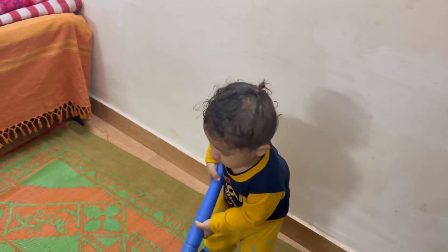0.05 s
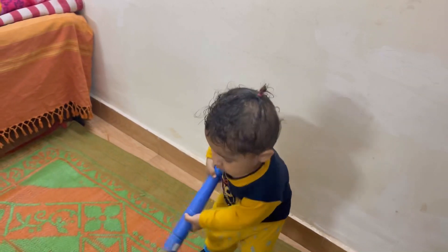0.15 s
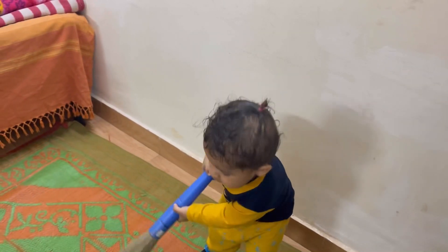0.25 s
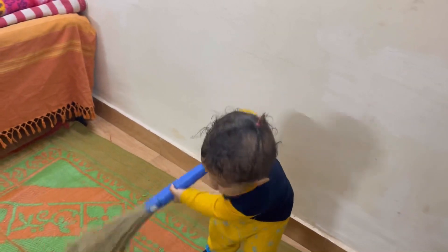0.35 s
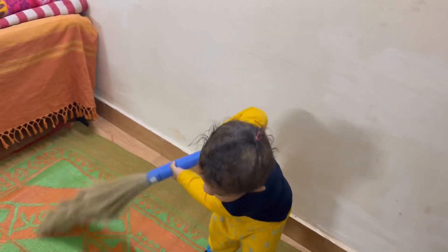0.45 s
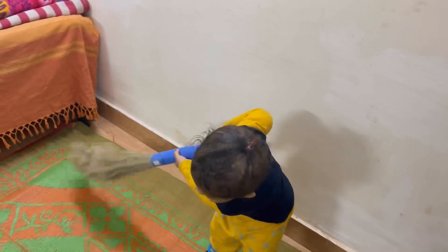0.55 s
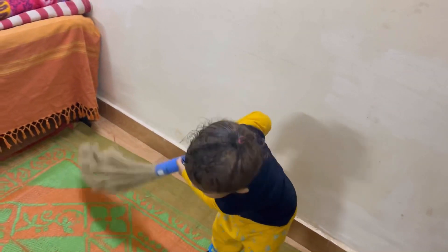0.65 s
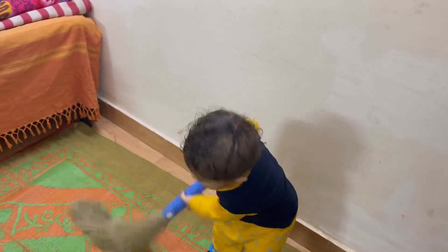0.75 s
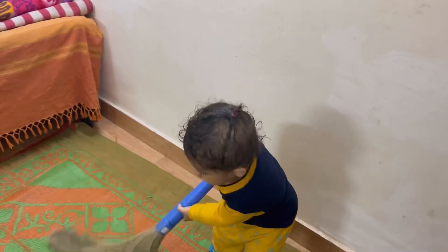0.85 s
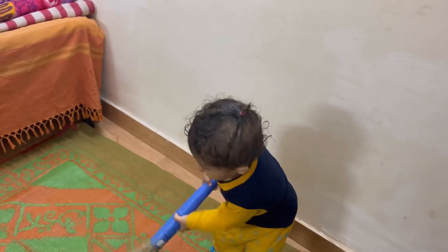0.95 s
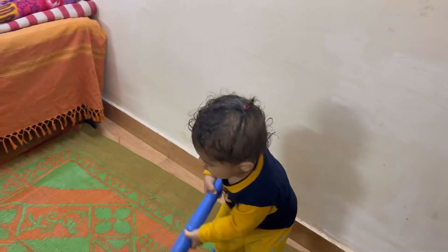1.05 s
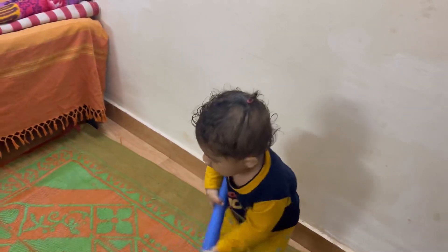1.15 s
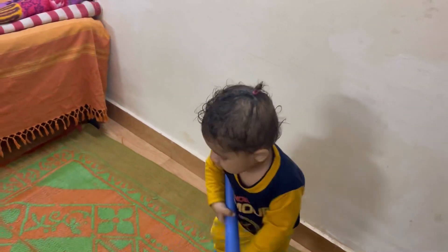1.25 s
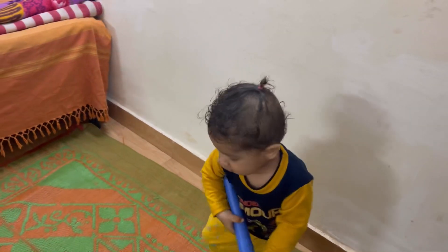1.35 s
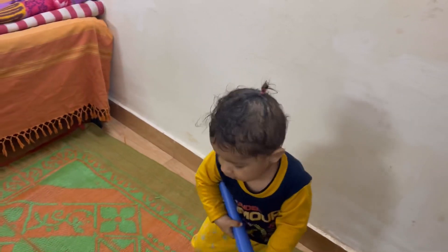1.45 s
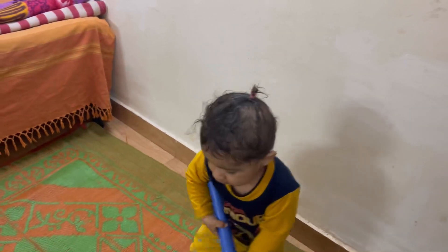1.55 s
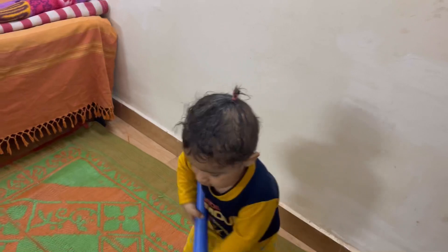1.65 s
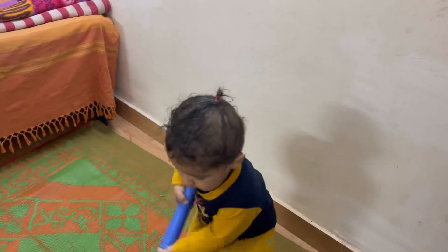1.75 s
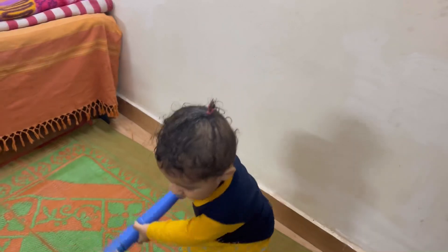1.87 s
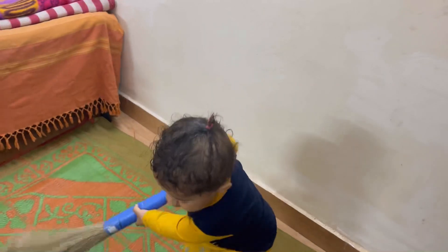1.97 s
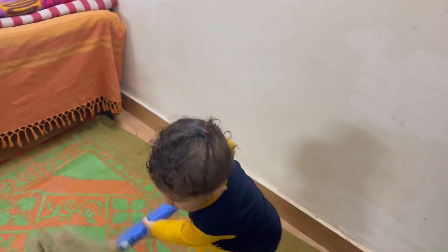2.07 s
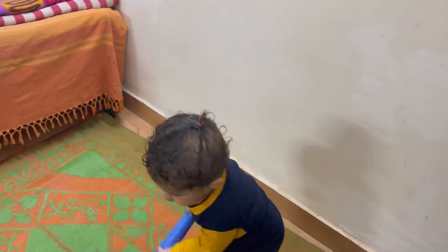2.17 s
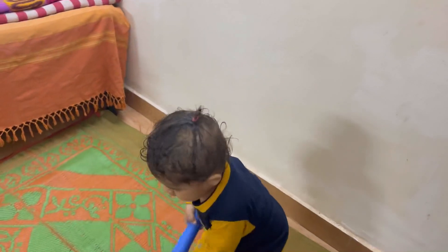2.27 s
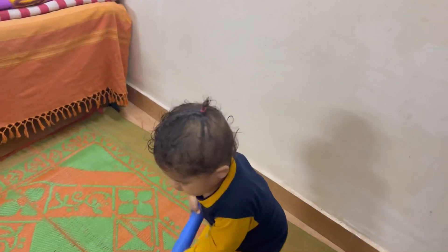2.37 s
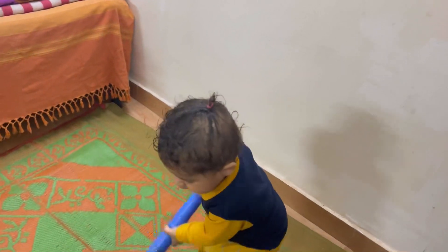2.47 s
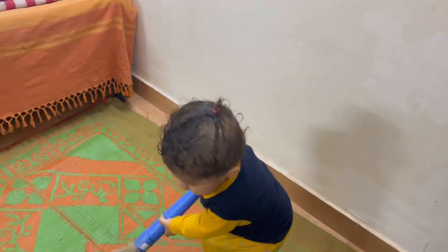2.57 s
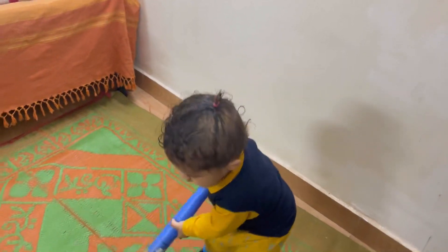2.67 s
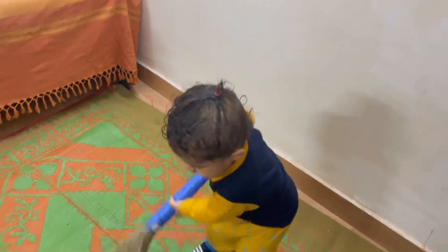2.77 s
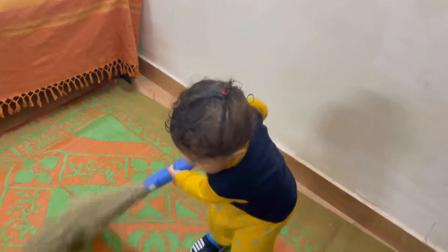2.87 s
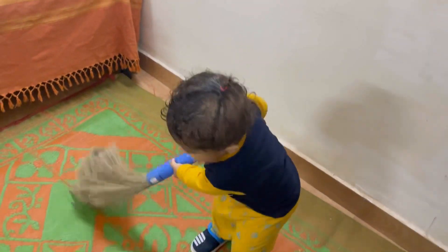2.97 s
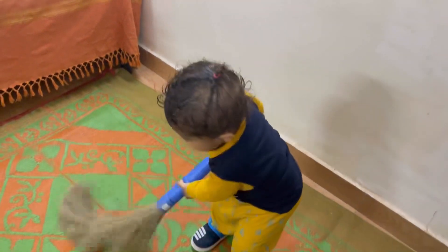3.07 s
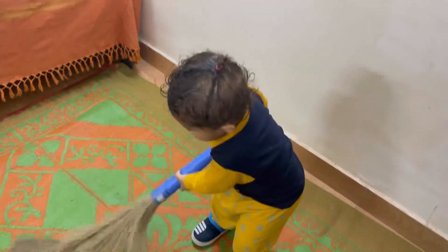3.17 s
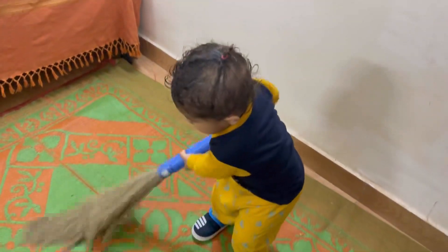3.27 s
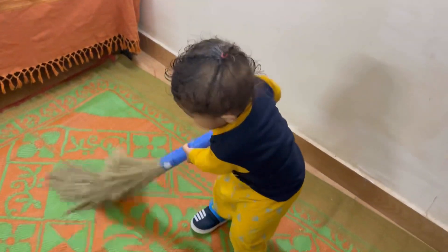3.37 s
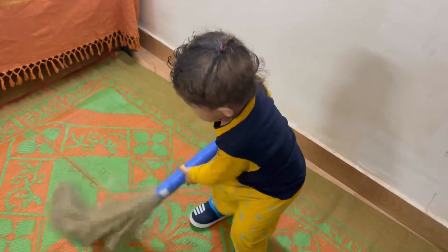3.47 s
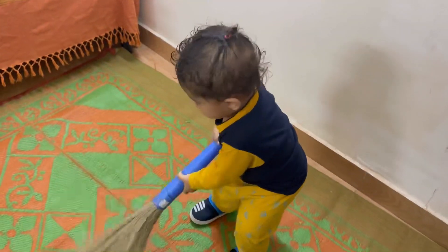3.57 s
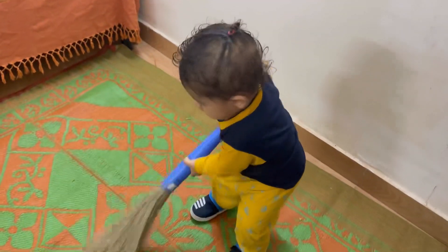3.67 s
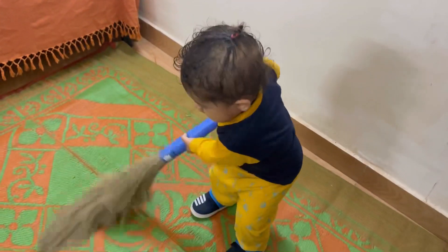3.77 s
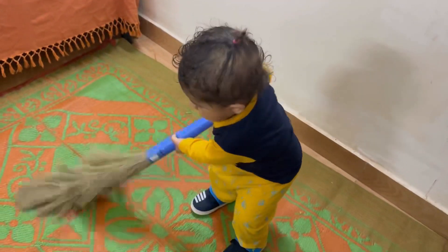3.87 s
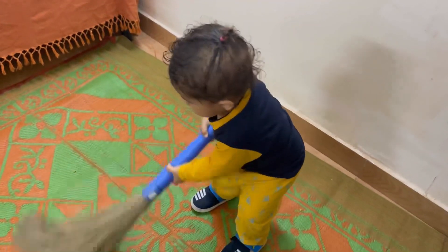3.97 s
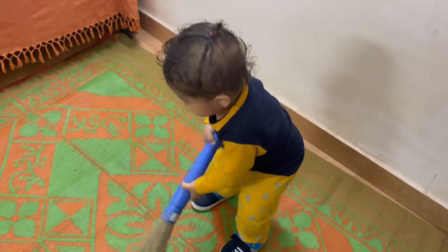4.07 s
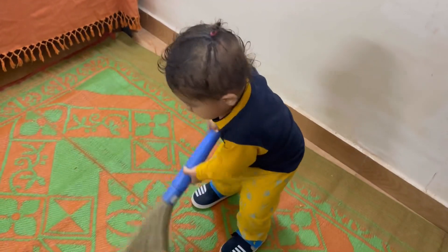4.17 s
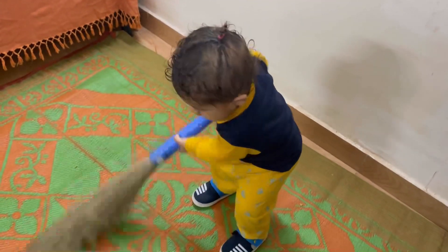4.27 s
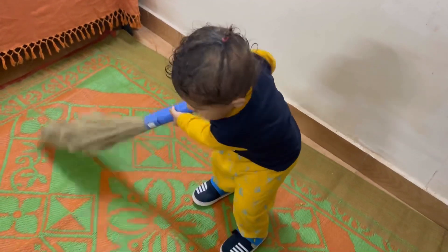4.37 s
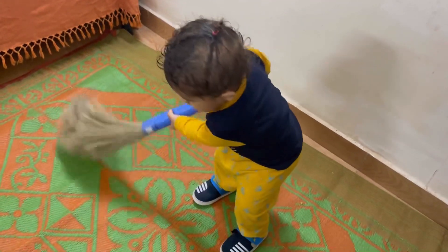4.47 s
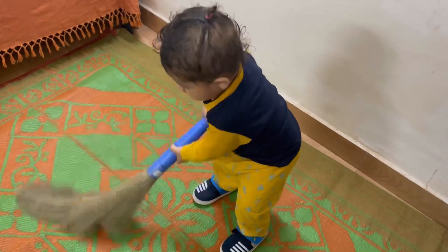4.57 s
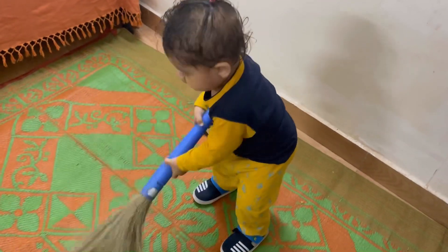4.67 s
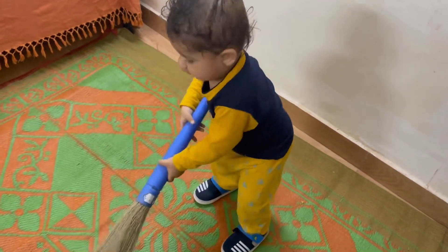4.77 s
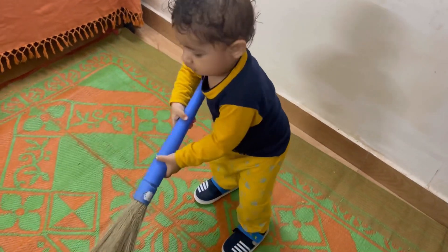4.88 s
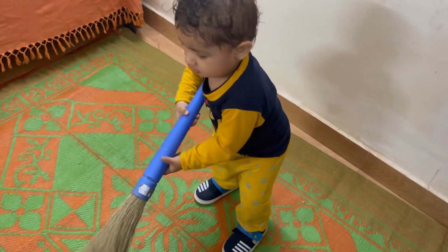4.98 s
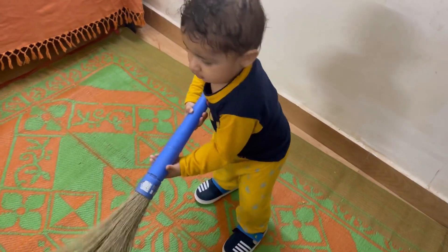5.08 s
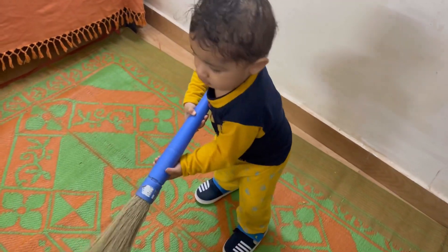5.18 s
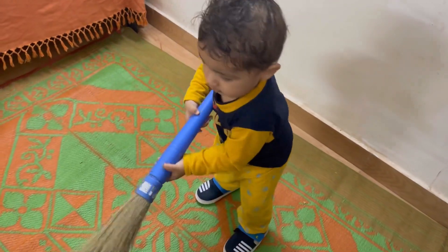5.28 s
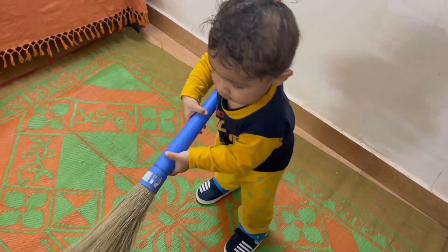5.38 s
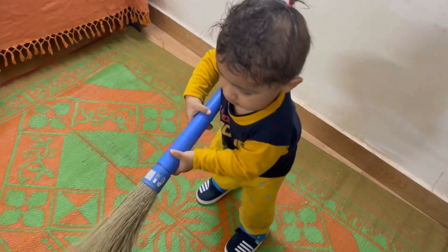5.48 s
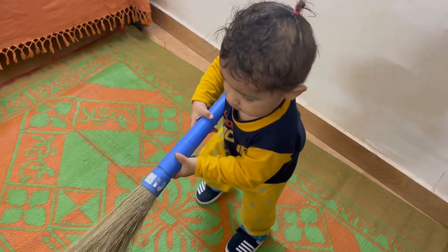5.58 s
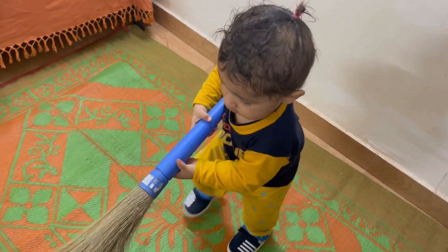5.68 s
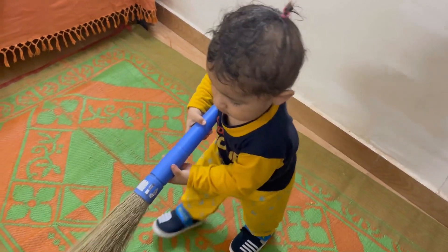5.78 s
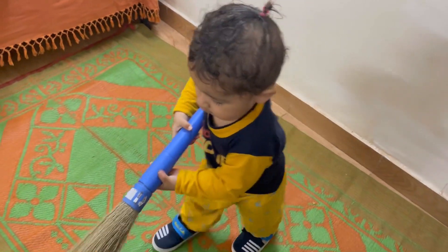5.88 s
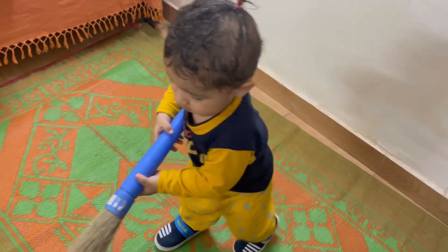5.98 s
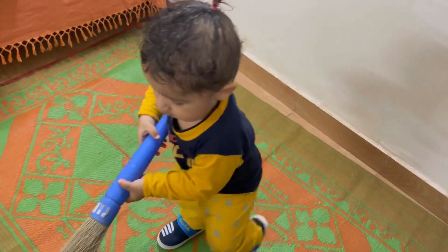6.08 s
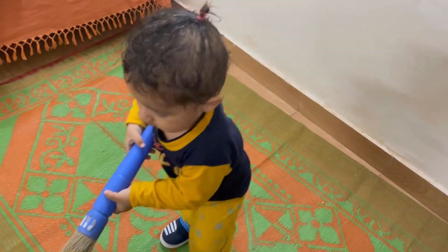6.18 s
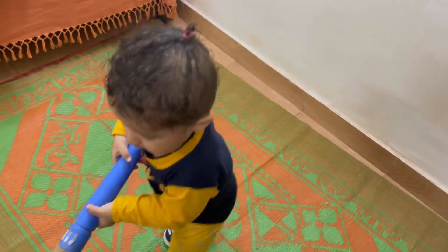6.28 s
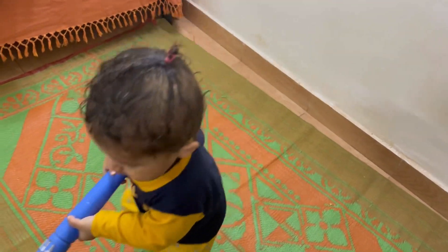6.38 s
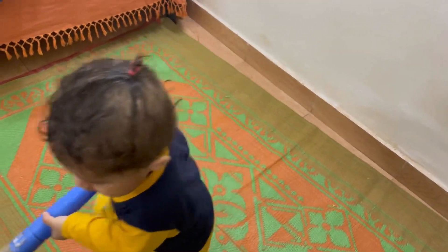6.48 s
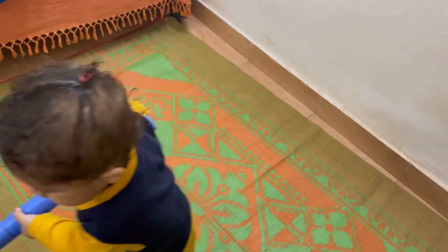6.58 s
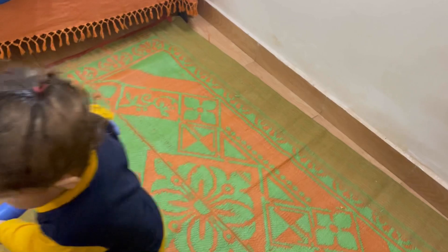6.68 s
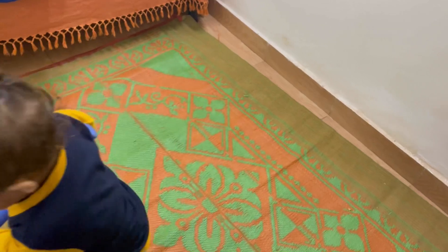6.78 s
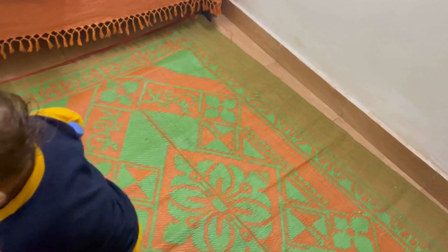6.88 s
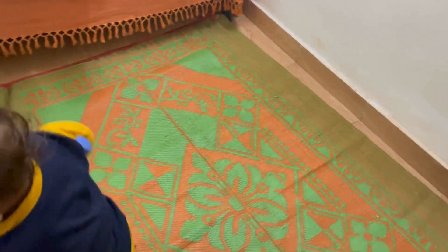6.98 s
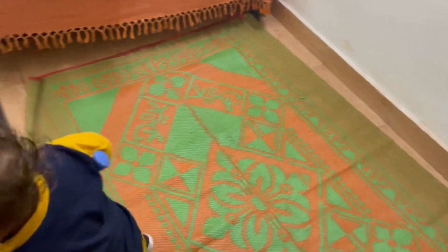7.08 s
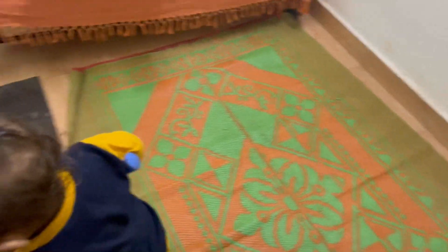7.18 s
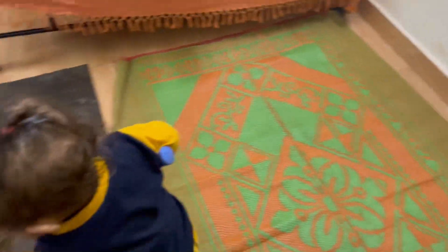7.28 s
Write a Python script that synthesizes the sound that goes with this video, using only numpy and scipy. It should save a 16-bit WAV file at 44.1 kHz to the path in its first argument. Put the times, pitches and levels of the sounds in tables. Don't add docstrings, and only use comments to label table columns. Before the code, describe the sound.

A dry grass broom swishes over a woven plastic mat in uneven strokes, then small shoes shuffle and knock, above low traffic rumble.

```python
import sys
import numpy as np
from scipy import signal
from scipy.fft import rfft, irfft, dct, next_fast_len
from scipy.io import wavfile
from scipy.ndimage import uniform_filter1d, map_coordinates

SR = 44100
rng = np.random.default_rng(int(sys.argv[2]) if len(sys.argv) > 2 else 0)


def generate_wav(sig):
    pcm = np.round(np.clip(np.atleast_2d(sig).T, -1, 1) * 32767).astype(np.int16)
    wavfile.write(sys.argv[1], SR, pcm)


def how_loud(loudness_db):
    steps = np.asarray(loudness_db, float) / 20
    return 10 ** steps


N = 323694


def unit(x):
    return x / np.sqrt(np.mean(x ** 2) + 1e-20)


def along(points, hz):
    f, v = np.transpose(points)
    return np.interp(np.log(hz + 1), np.log(f + 1), v)


def curves(rows, outside=None):
    s, *columns = np.transpose(rows)
    return [np.interp(np.arange(N) / SR, s, column, outside, outside) for column in columns]


def wobble(rate):
    knots = rng.standard_normal(int(N * rate / SR) + 4)
    return map_coordinates(knots, [np.arange(N) * rate / SR])


def filtered(x, response):
    m = next_fast_len(N + SR // 2)
    return irfft(rfft(x, m) * response(np.fft.rfftfreq(m, 1 / SR)), m)[..., :N]


def coloured(x, spectrum):
    return unit(filtered(x, lambda hz: how_loud(along(spectrum, hz))))


def resonant(x, modes):
    def response(f):
        total = 0
        for k, (centre, width, db) in enumerate(modes):
            peak = 1j * f * width / (centre * centre - f * f + 1j * f * width)
            total = total + (-1) ** k * how_loud(db) * peak
        return total
    return filtered(x, response)


def patchy(depth_db):
    z = signal.stft(rng.standard_normal((2, N)), nperseg=512)[2]
    field = uniform_filter1d(rng.standard_normal(z.shape[1:]), size=8, axis=0)
    field = uniform_filter1d(field, size=5, axis=1)
    return signal.istft(z * how_loud(depth_db * unit(field)), nperseg=512)[1][:, :N]


def tone(hz, db):
    return np.sqrt(2) * how_loud(db) * np.sin(2 * np.pi * np.cumsum(hz) / SR)


def strokes():
    # (peak time [s], swish level [dB], rise [s], fall [s], body level over the swish [dB])
    sweeps = [(0.11, -42.5, 0.053, 0.097, -26), (0.2, -31.5, 0.062, 0.079, -21),
              (0.282, -31.5, 0.06, 0.067, -20.5), (1.93, -47.5, 0.072, 0.037, -6.5),
              (0.451, -40, 0.48, 0.051, -16.5), (0.842, -37, 0.055, 0.21, -26),
              (1.079, -34, 0.06, 0.14, -24.5), (1.231, -29.5, 0.13, 0.1, -24),
              (1.596, -41, 0.034, 0.034, -8.5), (1.732, -26, 0.11, 0.12, -20.5),
              (1.792, -30, 0.043, 0.057, -37), (2.224, -26, 0.057, 0.072, -19),
              (2.466, -26.5, 0.065, 0.13, -24.5), (2.563, -27.5, 0.13, 0.037, -16.5),
              (2.686, -34, 0.056, 0.049, -20), (2.843, -30.5, 0.057, 0.089, -19),
              (3.144, -33, 0.075, 0.049, -25.5), (3.319, -31, 0.079, 0.072, -21.5),
              (3.529, -29, 0.089, 0.084, -19.5), (3.709, -26, 0.047, 0.16, -20.5),
              (4.03, -26, 0.055, 0.078, -18.5), (4.21, -26, 0.047, 0.11, -22.5),
              (4.279, -26, 0.057, 0.054, -19), (4.628, -29.5, 0.054, 0.097, -20.5)]
    landings = [(0.001, -48, 0.025, 0.019, -29), (0.541, -58, 0.002, 0.092, -24),
                (0.73, -35, 0.0035, 0.36, -19.5), (2.103, -33.5, 0.0069, 0.15, -20),
                (2.41, -46, 0.0087, 0.046, -24), (3.013, -46.5, 0.0075, 0.05, -23),
                (3.027, -32.5, 0.012, 0.11, -19), (1.553, -48.5, 0.00613, 0.055, -13.5),
                (3.473, -40, 0.008, 0.07, -26), (3.943, -35.5, 0.006, 0.055, -22),
                (4.528, -29, 0.0094, 0.15, -22)]
    shuffles = [(4.947, -58, 0.031, 0.13, -7), (5.3, -61.5, 0.034, 0.2, -4.5),
                (5.636, -68, 0.085, 0.083, 6), (5.815, -48.5, 0.0043, 0.008, -14),
                (5.83, -58, 0.01, 0.03, -8), (5.867, -46.5, 0.015, 0.012, -11),
                (5.885, -57.5, 0.02, 0.062, -4), (6.068, -64.5, 0.1232, 0.032, -3),
                (6.17, -72, 0.091, 0.1, -1), (6.268, -51.5, 0.0099, 0.079, -8.5),
                (6.405, -59, 0.014, 0.08, -4), (6.619, -48.5, 0.0039, 0.067, -7.5),
                (6.657, -42, 0.0056, 0.011, -12), (6.677, -58.5, 0.081, 0.17, -10),
                (6.933, -63, 0.1, 0.058, -7), (6.991, -44, 0.0025, 0.032, -6.5),
                (7.046, -59, 0.019, 0.72, -10), (7.333, -53.5, 0.026, 0.022, -3.5)]
    swing_db = 21
    roundness = 1.24
    body_swing, body_lingers = 0.89, 1.52
    t, swish, body = np.arange(0, N, 32) / SR, 0, 0
    for s, db, rise, fall, body_db in sweeps + landings + shuffles:
        def drop(slower):
            distance = (t - s) / np.where(t < s, rise, slower * fall)
            return swing_db * (np.hypot(distance, roundness) - roundness)
        swish = swish + how_loud(db - drop(0.94)) ** 2
        body = body + how_loud(db + body_db - body_swing * drop(body_lingers)) ** 2
    return [np.interp(np.arange(N) / SR, t, np.sqrt(power)) for power in (swish, body)]


def slips(rate, spread_db, life):
    strength = how_loud(spread_db * np.minimum(rng.exponential(size=N), 3.5))
    starts = (rng.random(N) < rate / SR) * strength
    return unit(signal.lfilter([1], [1, -np.exp(-1 / (life * SR))], starts))


def broom():
    # (frequency [Hz], level [dB per Hz])
    swish_spectrum = [(1500, -45.5), (3000, -21.5), (4500, -13.5), (6500, -9), (8000, -2.5), (8700, -1.5),
                      (10200, 1.5), (11200, -5), (12200, -13.5), (13200, -17.5), (14200, -17), (15500, -20),
                      (16000, -47)]
    # (frequency [Hz], level [dB per Hz])
    body_spectrum = [(500, -11), (1000, -8), (1500, -7.5), (2500, -4.5), (3500, -5), (5000, -3.5),
                     (8000, -22.5)]
    swish, body = strokes()
    tips = patchy(depth_db=1.0) * (2.5 + 0.47 * slips(rate=1100, spread_db=-1.0, life=0.00068))
    scrape = patchy(depth_db=1.0) * (4.5 + 0.59 * slips(rate=150, spread_db=2.0, life=0.0017))
    flutter_db = 0.25 * wobble(rate=34) + 0.56 * wobble(rate=28)
    hiss = swish * how_loud(flutter_db + 4.0) * coloured(tips, swish_spectrum)
    return hiss + body * how_loud(flutter_db + 3.5) * coloured(scrape, body_spectrum)


def snaps():
    # (time [s], peak level [dB], bright part over the peak [dB])
    stalk_snaps = [(0.079, -54, -2), (0.1176, -39, -4), (0.1351, -41, -6), (0.4506, -42, -3),
                   (0.5434, -37.5, 4.5), (0.5896, -47, -4), (0.6084, -44.5, 4.5), (0.6913, -49, 9),
                   (0.7563, -30, -2), (0.7855, -29, 1), (0.9143, -46, -4), (1.4501, -43, -8),
                   (1.551, -43, -9), (1.5715, -27, -14), (1.573, -24, -12), (1.5735, -27.5, -13),
                   (1.5745, -29, -13.5), (1.641, -32, -14), (1.6864, -27, -10), (1.9395, -37, -14),
                   (1.761, -41, 6), (2.1268, -41.5, 12), (2.683, -24, -7), (2.6966, -23, -15),
                   (2.799, -44, -9), (3.0235, -34, -3), (3.413, -32, -9), (3.984, -38, 3),
                   (4.6187, -35, -3), (4.881, -37, -1.5), (4.9486, -21.5, -19), (4.9504, -28, -9),
                   (4.952, -36, -6), (5.8145, -47, 2), (5.8155, -48, 4), (5.8605, -45, 3),
                   (5.874, -52, 3.5), (6.0039, -49, 0), (6.0689, -47, -1), (6.26, -47, 1),
                   (6.289, -33.5, -4), (6.62, -48, 3), (6.654, -36, 2), (6.9887, -38, -3),
                   (6.9996, -30, -2), (7.3344, -29.5, -13)]
    t60 = 0.014
    bright, stalk = np.zeros((2, N + SR)), np.zeros((2, N + SR))
    t = np.arange(SR // 50) / SR
    for s, db, bright_db in stalk_snaps:
        puff = 0.45 * rng.standard_normal((2, 2, len(t))) * how_loud(-60 * t / t60)
        puff[:, 0, 0] += 6.0
        place = slice(round(s * SR), round(s * SR) + len(t))
        stalk[:, place] += how_loud(db + 0.5) * puff[0]
        bright[:, place] += how_loud(db + bright_db + 8.5) * puff[1]
    edge_curve = [(3000, -12.0), (5500, -9.0), (9000, -1.0), (12000, -11), (15000, -24)]  # (Hz, dB)
    edge = filtered(bright[:, :N], lambda hz: how_loud(along(edge_curve, hz)))
    return edge + resonant(stalk[:, :N], [(1100, 900, -5), (2280, 1600, 2), (4350, 2200, -5)])


def knocks():
    # (time [s], peak level [dB], bright part [dB], ring frequency [Hz])
    blows = [(1.573, -48, -16, 232), (1.5735, -32.5, -23, 606), (1.576, -29, -25, 380),
             (1.596, -39, -27, 400), (1.606, -43, -22, 420), (6.655, -33, -28, 294),
             (6.991, -35.5, -4.5, 248), (7.001, -31, -14, 306.5), (7.005, -29.5, -6, 310),
             (7.011, -38.5, -0.5, 520), (7.018, -38.5, -2, 330), (7.029, -44, 1, 450),
             (7.039, -33.5, -8.5, 255), (7.047, -44, 1, 330), (7.062, -44, -11, 300), (7.074, -46, 1, 418),
             (7.084, -47, -9, 420), (7.147, -43, -15, 270)]
    # (centre [Hz], width [Hz], level [dB])
    floor_modes = [(223, 120, 5.5), (304, 190, 4.5), (447, 140, 3.5), (700, 180, 2.5)]
    # (centre [Hz], width [Hz], level [dB])
    sole_modes = [(860, 210, -2.5), (1380, 220, 3), (2300, 1000, -7.5)]
    thump, clack, ring = np.zeros((2, N + SR)), np.zeros((2, N + SR)), np.zeros(N + SR)
    t = np.arange(SR // 10) / SR
    for s, db, bright_db, hz in blows:
        blow = rng.standard_normal((2, 2, len(t))) * how_loud(-60 * t / 0.031)
        place = slice(round(s * SR), round(s * SR) + len(t))
        thump[:, place] += how_loud(db + 11.5) * blow[0]
        clack[:, place] += how_loud(db + bright_db + 18.0) * blow[1]
        ring[place] += how_loud(db + 0.5 - 60 * t / 0.042) * np.sin(2 * np.pi * hz * t)
    return resonant(thump[:, :N], floor_modes) + resonant(clack[:, :N], sole_modes) + ring[:N]


def squeaks():
    # (start [s], end [s], rms level [dB], first frequency [Hz], last frequency [Hz], width [Hz],
    #  lower resonance [Hz])
    twists = [
        (5.361, 5.75, -66, 4160, 4300, 200, 2450),
        (6.425, 6.6, -62, 4260, 4420, 300, 3070),
    ]
    low_width, low_db, fade_s = 220, -3, 0.02
    out = np.zeros((2, N))
    for start, end, db, first_hz, last_hz, width, low_hz in twists:
        rub = rng.standard_normal((2, SR // 2))[:, :round((end - start) * SR)]
        t = np.arange(rub.shape[1]) / SR

        def band(hz, wide):
            limits = [hz - wide / 2, hz + wide / 2]
            return unit(signal.sosfilt(signal.butter(2, limits, "band", fs=SR, output="sos"), rub))
        turn = t / t[-1] * np.pi / 2
        gate = np.clip(np.minimum(t, t[-1] - t) / fade_s, 0, 1)
        upper = np.cos(turn) * band(first_hz, width) + np.sin(turn) * band(last_hz, width)
        lower = how_loud(low_db) * band(low_hz, low_width)
        out[:, round(start * SR):][:, :len(t)] += how_loud(db) * gate * (upper + lower)
    return out


def room(x):
    # (frequency [Hz], time to fall by 60 dB [s])
    decay = [(200, 0.4), (2000, 0.53), (8000, 0.3), (14000, 0.13)]
    hz, t, z = signal.stft(rng.standard_normal((2, SR // 2)), SR, nperseg=256)
    fading = z * how_loud(-60 * t / along(decay, hz)[:, None])
    tail = signal.istft(fading, SR, nperseg=256)[1]
    late = np.pad(x, ((0, 0), (120, 0)))
    return signal.fftconvolve(late, tail / np.linalg.norm(tail[0]), axes=1)[:, :N]


def drones():
    # (time [s], frequency [Hz], rms level [dB])
    slowing = [(0.0, 47.3, -50), (0.05, 47.3, -41), (0.13, 47.17, -34), (0.3, 46.89, -46),
               (0.52, 46.52, -37), (0.61, 47.36, -44), (0.8, 49.13, -36.5), (1.28, 45.56, -54.5),
               (1.5, 48.72, -42.0), (2.09, 47.25, -30.5), (2.26, 47.19, -43.0), (2.41, 48.59, -28.5),
               (2.88, 45.97, -45.0), (3.07, 46.25, -39), (3.2, 46.35, -56), (3.35, 46.47, -44),
               (3.5, 46.37, -52), (4.01, 45.68, -39.5), (4.5, 43.97, -39.0), (5.0, 42.82, -44.5),
               (5.4, 40.8, -48.5), (6.2, 39.79, -59.0), (6.3, 40.5, -51.0)]
    steady = [(0.01, 53.2, -47.5), (0.92, 55.99, -58.0), (1.8, 50.13, -42.0), (2.41, 50.86, -45.5),
              (3.29, 50.59, -54.0), (3.72, 51.62, -40.0), (4.23, 52.06, -48.0), (4.79, 51.53, -37.0),
              (5.3, 53.12, -47.5), (5.51, 51.47, -37.0), (5.9, 54.01, -48.0), (6.6, 51.1, -39.0),
              (6.8, 51.27, -49.5), (7.3, 51.99, -41.0)]
    distant = [(0.05, 44.98, -54.0), (0.6, 40.17, -49.0), (1.1, 42.12, -51.0), (1.49, 39.38, -50.5),
               (1.93, 42.29, -52.5), (2.32, 42.42, -62.0)]
    revving = [(4.2, 61.1, -63), (4.45, 65.8, -50.5), (4.701, 71.3, -46), (5.0, 84.2, -49.5),
               (5.2, 88.8, -67)]
    engine = [(5.5, 165.5, -73), (5.7, 169.5, -56), (5.99, 174.3, -49.5), (6.15, 178.8, -56),
              (6.3, 181, -52.5), (6.48, 182.3, -46.5), (6.6, 188.6, -53), (6.77, 213, -50), (6.9, 202, -79)]
    engine_hz, engine_db = curves(engine)
    fade = np.interp(np.arange(N) / SR, [5.3, 5.5, 6.9, 7.1], [0, 1, 1, 0])
    boom = sum(tone(*curves(vehicle)) for vehicle in (slowing, steady, distant, revving))
    return boom + fade * tone(engine_hz + 1.46 * wobble(rate=30), engine_db + 1.3 * wobble(rate=12))


def street():
    # (time [s], rms level [dB])
    murmur_level = [(0.0, -51), (0.4, -51), (0.75, -51), (1.2, -51.5), (1.75, -50), (2.15, -50.5),
                    (2.5, -50), (3.3, -51.5), (3.9, -52.5), (4.7, -50.5), (5.2, -50), (5.5, -49.5),
                    (5.8, -50), (6.1, -49.5), (6.35, -48.5), (6.6, -49), (6.85, -50), (7.2, -50),
                    (7.34, -46.5)]
    # (frequency [Hz], level [dB per Hz])
    traffic = [(15, -58), (25, -15.5), (42, -9.5), (62, -6), (82, -19), (193, -20), (229, -20.5),
               (414, -25.5), (585, -27), (1110, -31.5), (1380, -31), (1610, -34.5), (3620, -42.5),
               (4300, -53), (9000, -56), (11700, -93), (19800, -120)]
    # (time [s], rms level [dB])
    whine_level = [(3.0, -72), (3.37, -61), (3.7, -63), (4.57, -62), (4.8, -61), (5.04, -58), (5.1, -48.5),
                   (5.16, -55), (5.2, -63), (5.29, -56), (5.38, -65), (5.49, -53), (5.58, -69), (5.7, -58),
                   (6.0, -68)]
    # (frequency [Hz], level [dB per Hz])
    port_hiss = [(5000, -0.5), (8000, 1), (10200, 1.5), (10900, 5), (11500, -30), (13000, -47)]
    surge_db = 0.7 * wobble(rate=5)
    murmur = how_loud(curves(murmur_level)[0] + 6.5 + surge_db) * coloured(patchy(depth_db=1.15), traffic)
    whine_db = curves(whine_level, outside=-120)[0] - 2.5
    whine = np.array([tone(1394.0 + 10.0 * wobble(rate=45), whine_db + 1.3 * wobble(rate=29))
                      for take in range(2)])
    return murmur + whine + how_loud(-67.0) * coloured(rng.standard_normal((2, N)), port_hiss)


def ports(pair):
    # (frequency [Hz], likeness [0-1])
    alike = [(60, 0.89), (170, 0.87), (600, 0.3), (1900, 0.043), (3000, 0.22), (4400, 0.58), (5100, 0.4),
             (6300, 0.93), (7100, 0.18), (8600, 1), (12600, 0.87), (13200, 0.55), (14400, .5), (15000, 0.5)]
    # (frequency [Hz], left over right [dB])
    lean = [(100, -2.5), (600, 0), (2000, 1), (3100, 4), (4400, 2.5), (5100, 5), (6000, 5.5), (7050, 2),
            (7700, 3), (8600, 0), (16000, 0)]
    # (frequency [Hz], right leads by [radians])
    lead = [(100, .05), (2000, 0), (4400, -.2), (5100, -.6), (6500, -.05), (7500, -1.1), (8600, 0),
            (10200, np.pi), (11750, 2 * np.pi), (12800, 2 * np.pi), (13400, 3 * np.pi), (14300, 3 * np.pi),
            (14900, 4 * np.pi)]

    def split(hz):
        angle = np.arccos(np.clip(along(alike, hz), 0, 1)) / 2
        return np.array([np.cos(angle), np.sin(angle)])
    shared, own = filtered(pair, split)
    side = np.array([[1], [-1]])

    def port_response(hz):
        return how_loud(side * along(lean, hz) / 2) * np.exp(-0.5j * side * along(lead, hz))
    return filtered(shared + side * own, port_response)


def scene():
    hits = snaps() + knocks()
    near = broom() + squeaks() + hits + how_loud(-6.0) * room(hits)
    return ports(near + street()) + drones() * how_loud([[-0.25], [0.25]])


def thinned(x):
    # (frequency [Hz], level [dB])
    hearing = [(9000, -110), (9900, -94), (11000, -90.5), (12400, -92), (13100, -92), (14200, -87),
               (14800, -99), (15700, -100), (15900, -50)]
    # (frequency [Hz], level under it [dB])
    masking = [(1200, -50), (1800, -30), (2600, -26.5), (3500, -26), (5000, -27), (6000, -27), (7000, -30),
               (9000, -45), (12000, -33), (12400, -25), (12750, -17), (13050, -14), (13600, -18),
               (14200, -20), (14700, -30), (15600, -33), (15900, -20)]
    # (frequency [Hz], level under it [dB])
    shadow = [(2000, -30), (3600, -7), (4600, -9), (5200, -15), (6400, -12), (8000, -14), (9700, -16),
              (10200, -3), (10600, -18), (11900, -12), (13000, -16), (14500, -16), (15000, 6)]
    hop, lead, scale = 1024, 1024 + 52, 41
    t = np.arange(N // hop + 2)
    hz = (np.arange(hop) + 0.5) * SR / (2 * hop)
    window = np.sin(np.pi * (np.arange(2 * hop) + 0.5) / (2 * hop))
    pair = np.pad([x[0] + x[1], x[0] - x[1]], ((0, 0), (lead, 3 * hop))) / 2
    a, b, c, d = np.split(pair[:, hop * t[:, None] + np.arange(2 * hop)] * window, 4, axis=2)
    folded = np.concatenate([-c[..., ::-1] - d, a - b[..., ::-1]], axis=2)
    z = dct(folded, type=4, norm="ortho").transpose(0, 2, 1) / scale
    edges = np.unique(np.geomspace(20, len(hz), num=85).astype(int))[:-1]
    band = np.maximum(np.searchsorted(edges, np.arange(len(hz)), side="right") - 1, 0)
    power = np.add.reduceat(abs(z) ** 2, edges, axis=1) / np.bincount(band)[:, None]
    level = 10 * np.log10(power + 1e-20)
    loudest = level[:, len(edges) // 2:].max(axis=(0, 1))

    def per_band(points):
        return along(points, hz[edges])[:, None]
    limit = np.maximum(per_band(masking) + loudest, per_band(shadow) + level[::-1])
    limit = limit + 4.5 * uniform_filter1d(rng.standard_normal(limit.shape), size=3)
    limit = limit + 1.8 * per_band([(11000, 0.061), (13000, 0.86)]) * rng.standard_normal(len(t))
    limit = limit - 15.0 * (np.diff(loudest, append=-200) > 7)
    limit = limit - 15.0 * (np.diff(loudest, prepend=0) > 7)
    limit = np.maximum(limit, per_band(hearing) + 2.8 * rng.standard_normal(limit.shape))
    keep = (level > limit)[:, band] & (abs(z) > how_loud(limit - 2.5)[:, band])
    keep[:, hz < 1000] = True
    u, v = np.split(dct((z * keep).transpose(0, 2, 1), type=4, norm="ortho") * scale, 2, axis=2)
    frames = np.concatenate([v, -v[..., ::-1], -u[..., ::-1], -u], axis=2) * window
    joined = frames[:, 1:, :hop] + frames[:, :-1, hop:]
    mid, side = joined.reshape(2, -1)[:, lead - hop:][:, :N]
    return np.array([mid + side, mid - side])


def roll_off(x):
    return signal.sosfilt(signal.butter(12, 16620, fs=SR, output="sos"), x)


def record(dry):
    bass_cut = [(25, -28), (33, -26), (40, -0.5)]  # (Hz, dB)
    heard = filtered(dry, lambda hz: how_loud(along(bass_cut, hz)))
    mix = thinned(heard)
    return roll_off(mix)


dry = scene()
out = record(dry)
generate_wav(out)
```